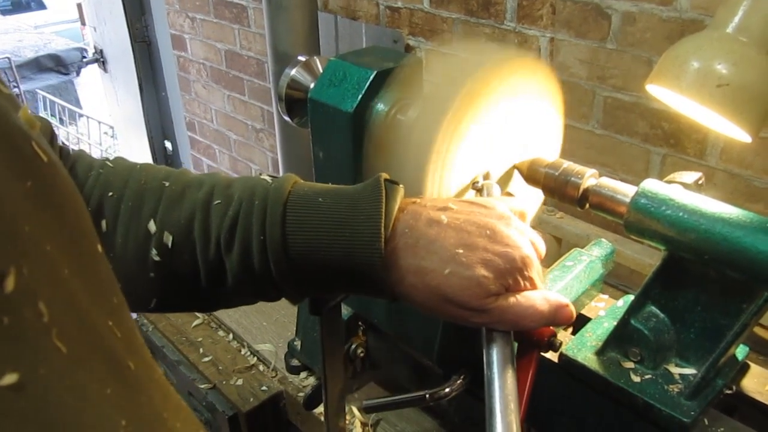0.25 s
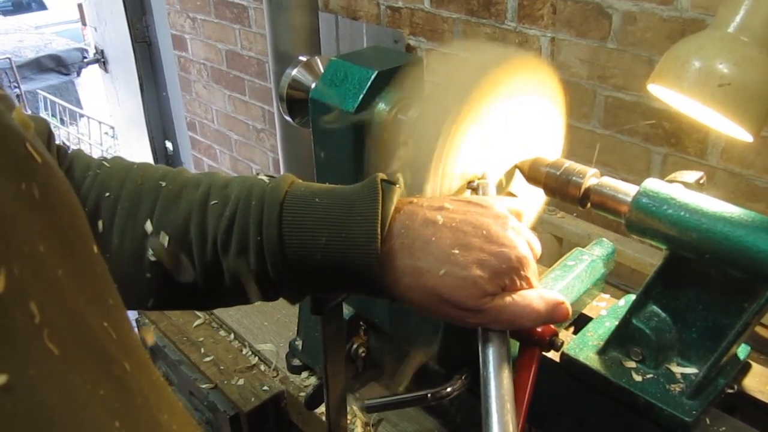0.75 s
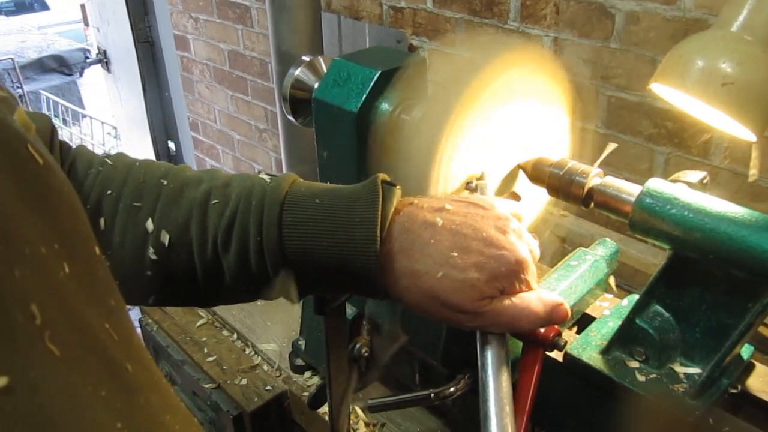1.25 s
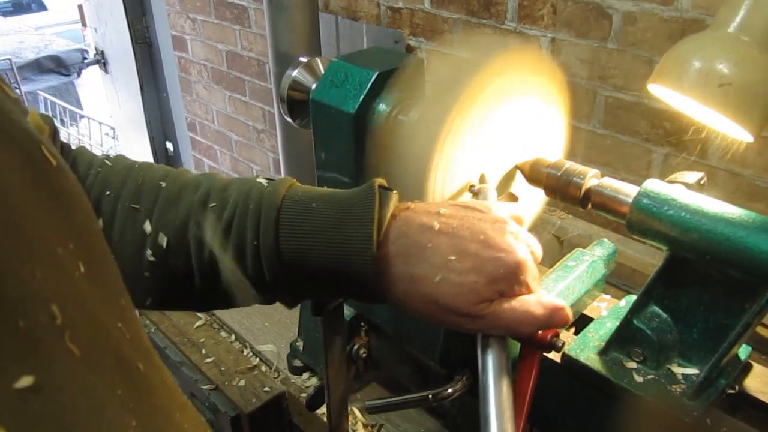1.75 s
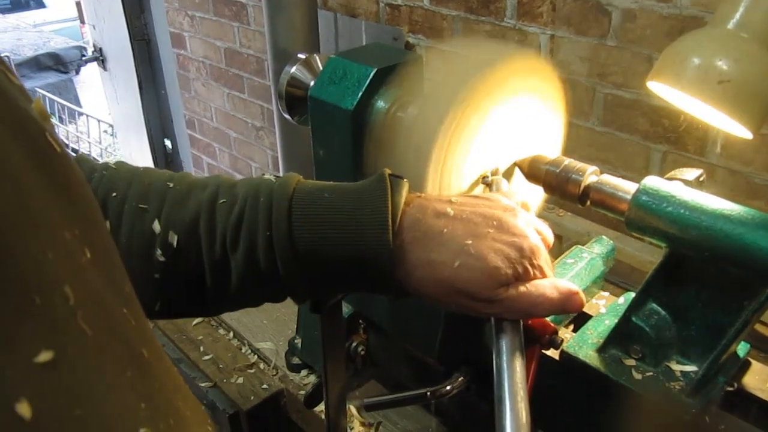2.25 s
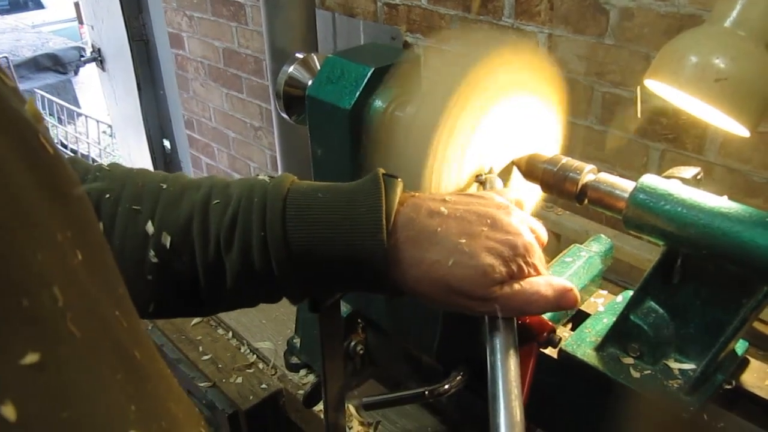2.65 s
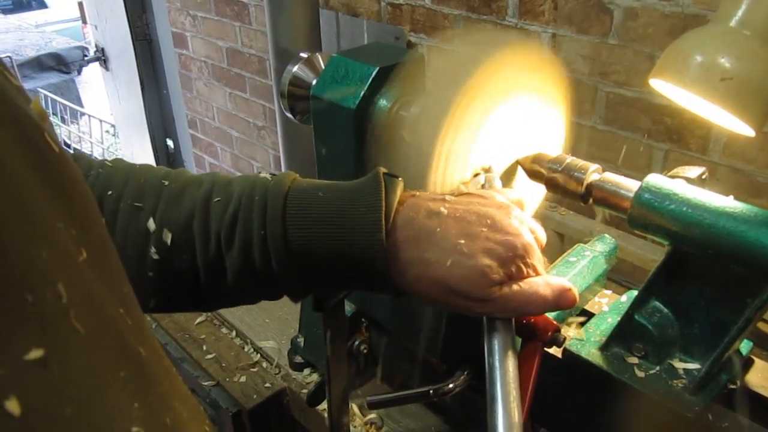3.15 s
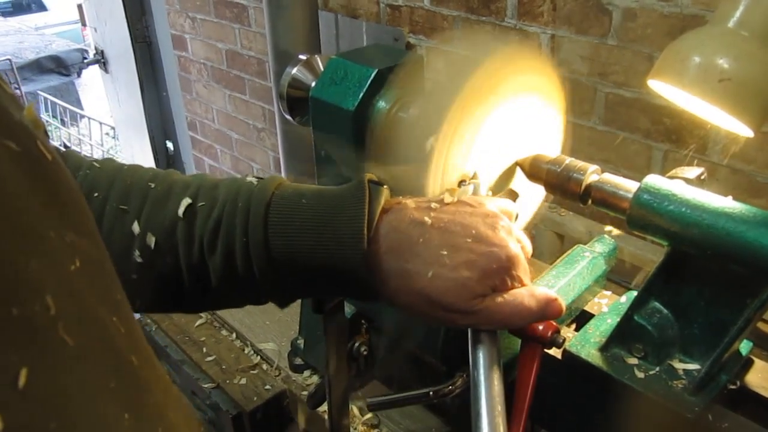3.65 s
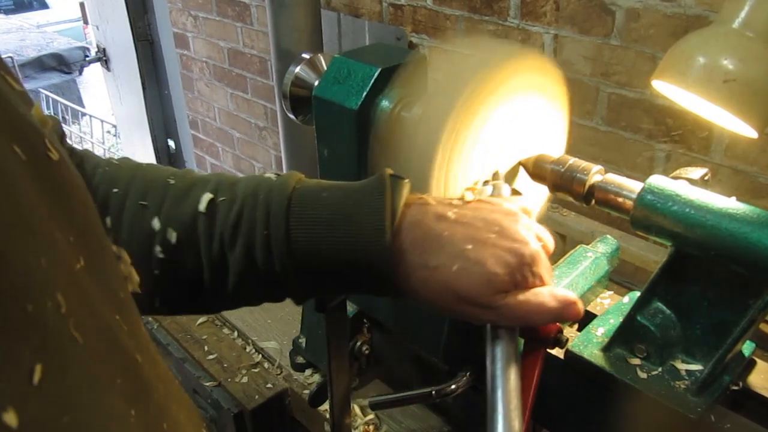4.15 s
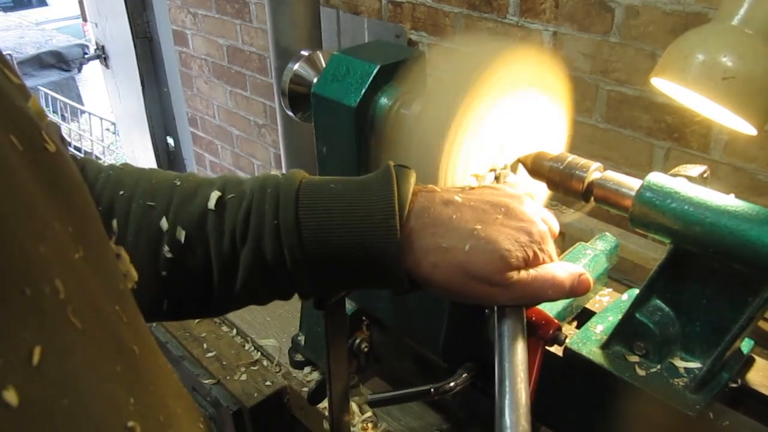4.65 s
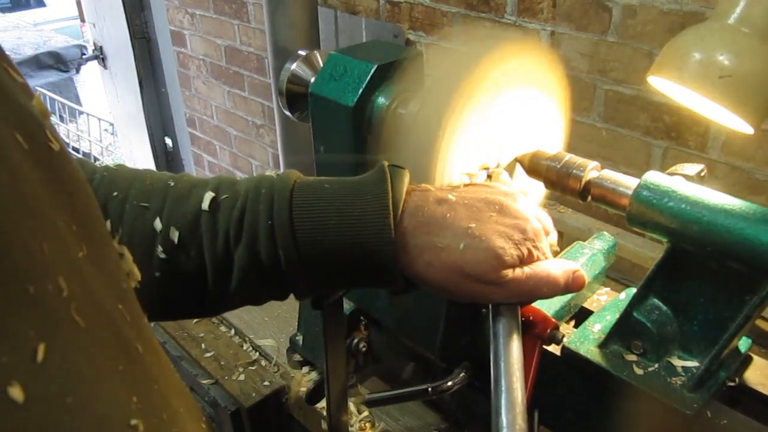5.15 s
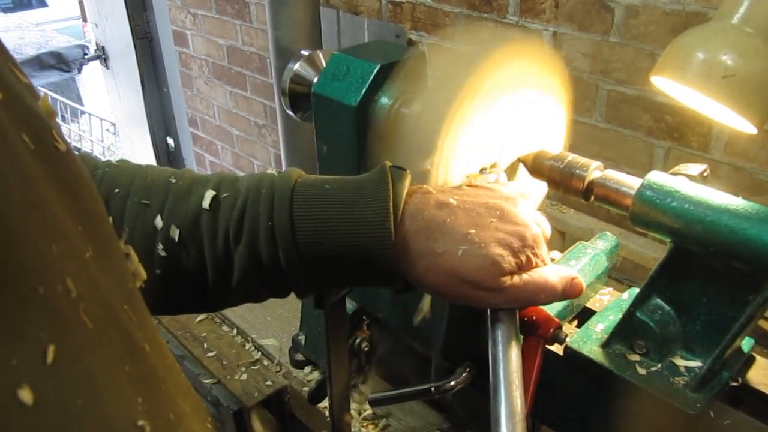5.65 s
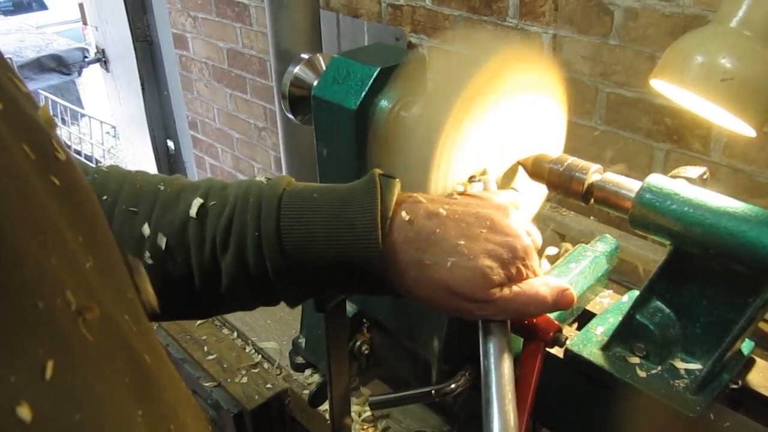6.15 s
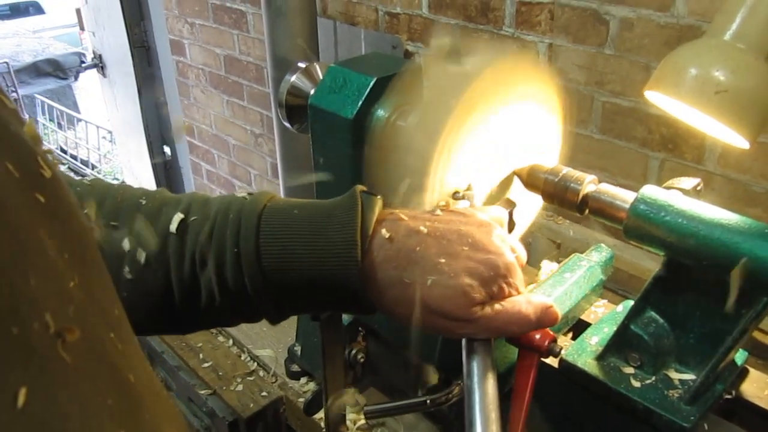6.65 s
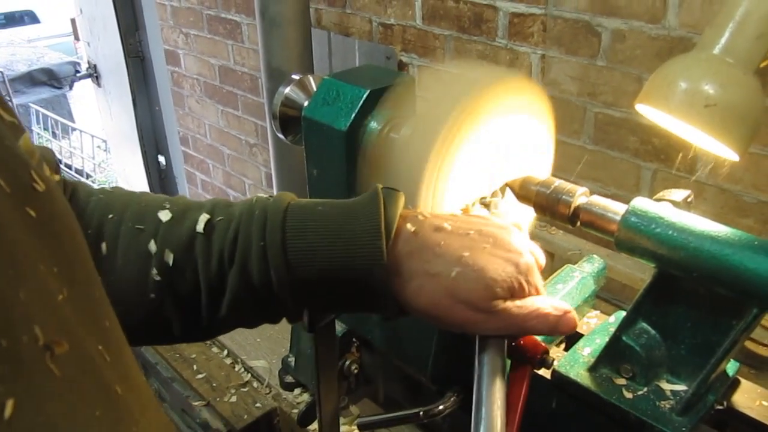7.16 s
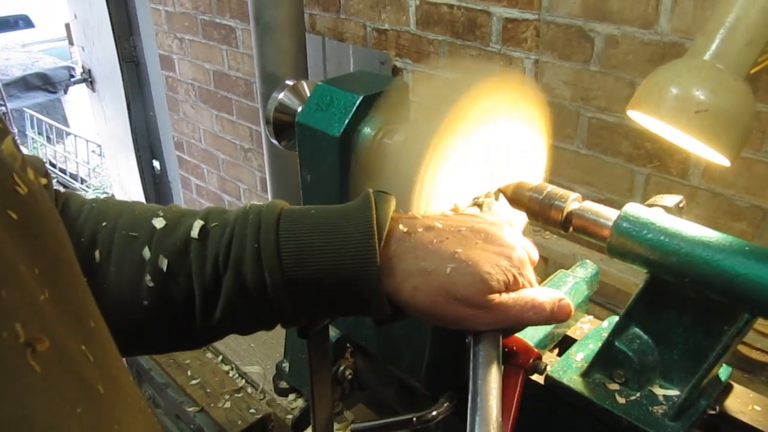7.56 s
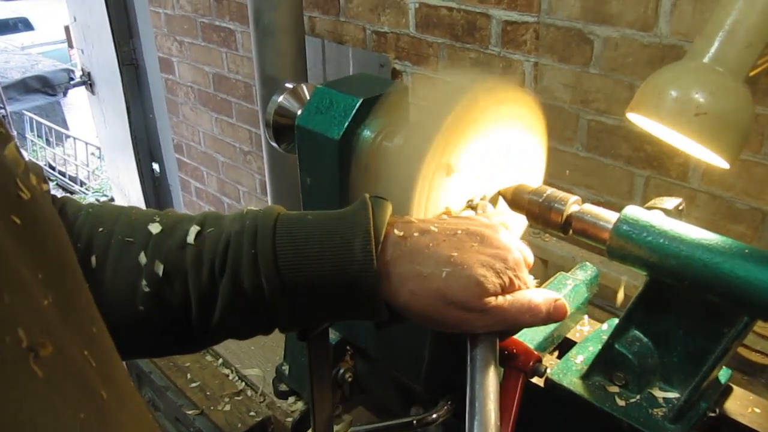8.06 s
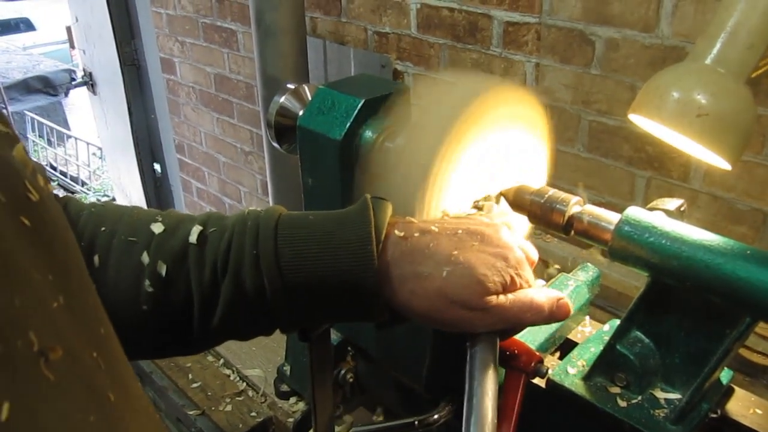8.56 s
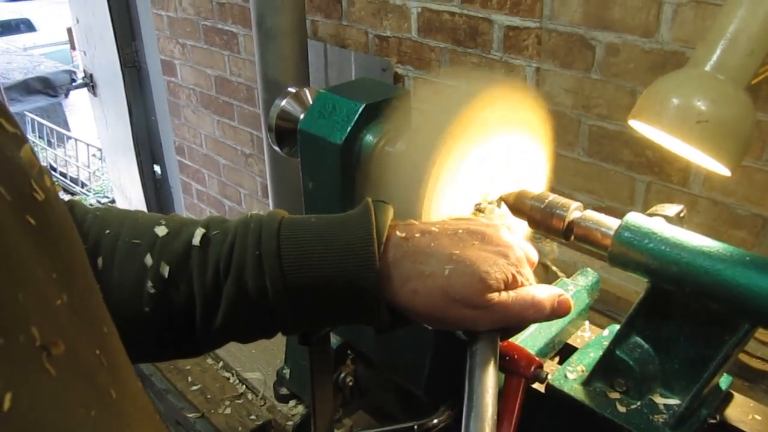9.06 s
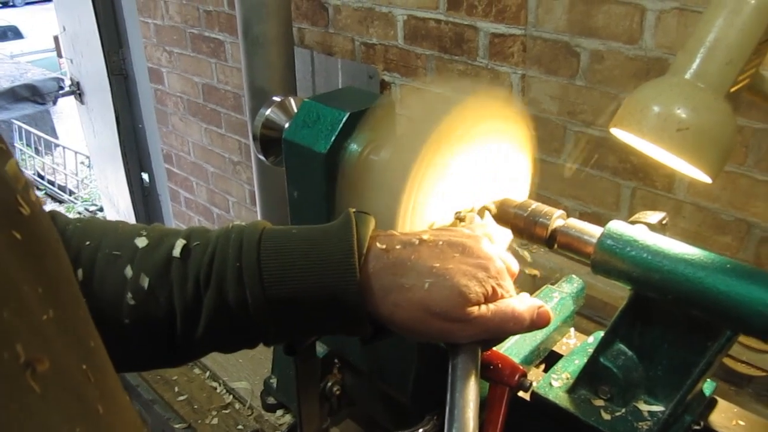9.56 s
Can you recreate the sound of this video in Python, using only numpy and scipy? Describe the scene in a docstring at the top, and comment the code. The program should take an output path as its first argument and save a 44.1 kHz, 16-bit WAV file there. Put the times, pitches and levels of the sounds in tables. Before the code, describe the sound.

A wood lathe hums and whirrs steadily in a small workshop while a gouge peels a wet bowl blank. Five cuts hiss and rasp with a rapid flutter, separated by short pauses of faint skimming. The steel rings lightly, the wood drums low, and the edge sings briefly late in each of the first three cuts. The last two are shorter and raspier as the motor grows slightly louder.

```python
"""A lathe hums and whirrs in a small brick workshop, a gouge already peeling its wet bowl blank.
Twice a turn the edge meets end grain and tears out a burst of fibres; the steel rings, the blank drums.
Soon a long shaving makes the edge sing, as it will again in the second and third cuts.
At 1.6 s the first cut ends and the tool only skims the wood, as it does in each later pause.
The last two of the five cuts are made mostly on the tip, while the drive grows louder."""
import sys
import numpy as np
from scipy import signal
from scipy.fft import rfft, irfft, next_fast_len
from scipy.io import wavfile
from scipy.ndimage import uniform_filter1d

SR = 44100
rng = np.random.default_rng(int(sys.argv[2]) if len(sys.argv) > 2 else 0)


def unload_wav(signal):
    """Save mono or channel-first audio to the path in sys.argv[1] as 16-bit WAV at rate SR, clipped to [-1, 1]."""
    wavfile.write(
        sys.argv[1],
        SR,
        np.round(np.clip(np.atleast_2d(signal).T, -1, 1) * 32767).astype(np.int16),
    )


N = 432180
TIME = np.arange(N) / SR
GRID = next_fast_len(N + SR // 2, True)
HZ = np.fft.rfftfreq(GRID, 1 / SR)
TURNS_PER_S, RELEASE_S, TOP_HZ = 16.15, 0.11, 15750

# Levels in all tables are relative.
# Steady tones of the motor: f/Hz, level/dB
MOTOR_TONES = [(32.3, -64), (100, -64.5), (199.5, -57)]
# Broad spectra of the drive's whirr and the edge's hiss, rasp and skimming: f/Hz, level/dB
WHIRR_SPECTRUM = [(15, -14), (33, -8), (55, -13), (75, -23), (125, -2.5), (175, -22), (250, -8), (370, -7),
                  (800, -3.5), (1150, -9.5), (1450, -11), (2300, -6.5), (3200, -13.5), (6000, -14),
                  (12000, -41)]
SHEAR_SPECTRUM = [(1500, -24.5), (3000, -16.5), (5000, -4), (5600, -6), (6500, -3), (7200, -1),
                  (8400, -0.5), (9200, 2), (10200, 0.5), (10900, -9.5), (11400, -8.5), (12800, -16),
                  (13700, -24), (15700, -33)]
RASP_SPECTRUM = [(150, -52), (400, -13), (700, -14), (1100, -12), (1600, -13), (1900, -3), (2400, -6),
                 (2900, 1), (3450, -0.5), (3700, 2.5), (4100, 0.5), (5000, -4.5), (6500, -10), (10000, -52)]
SKIM_SPECTRUM = [(1500, -25), (4500, -33), (5800, -1), (6700, -7.5), (7400, 6), (8200, -2), (9000, 2),
                 (10100, 1.5), (11500, -9.5), (13000, -14), (14500, -37)]
# Resonances of the cast housing and the tool rest: f/Hz, bandwidth/Hz, level/dB
HOUSING_MODES = [(200, 26, -8), (330, 16, -27), (427, 10, -6.5), (641, 61, -8), (680.5, 17, -4),
                 (850, 15, -8.5), (908.5, 15, 2), (1343, 45, -5.5), (1509, 24, -3.5), (1706, 21, -4),
                 (2283, 49, -3.5)]
REST_MODES = [(1423, 200, -16.5), (1914, 190, -11), (2836, 185, 2), (2986, 91, 5.5), (3184, 200, -1),
              (3390, 100, -2.5), (4130, 54, -22)]
# Resonances of edge, shaft and blank, cutting on the wing or the tip: f/Hz, bandwidth/Hz, level/dB
WING_EDGE_MODES = [(6470, 190, -5), (6920, 260, -5), (8990, 280, -4.5), (9440, 170, 3.5), (10820, 340, -6),
                   (11830, 220, -9.5), (13100, 300, -21)]
TIP_EDGE_MODES = [(6410, 310, 6.5), (7370, 210, -2), (9220, 240, 0), (10720, 250, 1.5), (11900, 220, -3)]
WING_SHAFT_MODES = [(4600, 140, -1), (4775, 154, 5), (4990, 190, 2)]
TIP_SHAFT_MODES = [(4714, 56, 0)]
WING_BLANK_MODES = [(198.3, 9, -0.5), (268, 20, -11.5), (320.5, 16, -4.5), (340, 11, -15),
                    (652.6, 8.4, -10.5), (892, 12, -8)]
TIP_BLANK_MODES = [(132, 35, -14), (205, 16.7, -1.5), (256.6, 16, -6), (316, 8.1, 5), (653, 19, -10),
                   (919, 27, -6.5)]
# The five cuts: start/s, end/s
CUT_TIMES = [(-0.6, 1.605), (2.05, 3.84), (4.33, 6.79), (7.42, 8.36), (8.72, 9.8)]
# Course of each cut: attack/s, then entry and exit values of hiss/dB, ring/dB, lean/dB
# (ring: shaft re hiss; lean: how much harder the first end-grain side tears than the second)
CUT_COURSES = [(1.07, -20, -26, 0, -6, -10, 4.5), (0.61, -23.8, -24.6, -4, -5.5, 7.5, -4),
               (0.54, -27.5, -22, -4.5, -7, -6, 0.5), (0.45, -24.5, -29, -2.5, -2, 4, -2),
               (0.31, -25.5, -27, 0, -4, -3.5, -2)]
# Part of the edge that cuts: t/s, share (0 broad wing, 1 narrow tip)
TIP_SHARE = [(0.3, 0.3), (1.0, 0.04), (1.6, 0.06), (2.3, 0.55), (3, 0.5), (3.4, 0.18), (3.9, 0.2),
             (4.6, 0.55), (5.2, 0.88), (5.7, 0.45), (6.1, 0.2), (6.8, 0.08), (7.5, 0.8), (9.8, 0.95)]
# Lag of the end grain behind an evenly turning spindle: t/s, lag/turns
GRAIN_LAG = [(0, 0.25), (0.45, 0.19), (1.2, 0.27), (1.6, 0.36), (2.4, 0.37), (3.0, 0.43), (3.5, 0.38),
             (3.8, 0.42), (4.7, 0.35), (5.3, 0.37), (6.1, 0.24), (6.5, 0.25), (6.85, 0.42), (7.8, 0.38),
             (8.35, 0.25), (8.95, 0.38), (9.5, 0.23), (9.8, 0.17)]
# Gap from the first end-grain side to the second, the grain being not quite straight: t/s, gap/turns
GRAIN_SPACING = [(0.3, 0.45), (1.6, 0.49), (2.4, 0.58), (3.3, 0.53), (4.8, 0.47), (6.8, 0.48), (7.8, 0.57),
                 (8.95, 0.45), (9.8, 0.48)]
# Drumming of the blank: t/s, level/dB
DRUM_LEVELS = [(0.0, -48), (0.02, -44), (1.09, -40.5), (1.63, -45.5), (1.72, -54.5), (2.7, -39.5),
               (3.66, -50.5), (3.71, -38), (4.04, -55), (4.5, -46.5), (4.91, -37.5), (4.99, -46),
               (5.16, -36.5), (5.24, -45.5), (6.25, -44.5), (6.3, -37.5), (6.55, -47), (6.58, -41.5),
               (6.88, -53.5), (7.91, -38), (8.49, -48), (9.06, -36), (9.36, -43.5), (9.8, -39)]
# Reverberation time of the workshop: f/Hz, T60/s
ROOM_DECAY = [(150, 0.1), (1500, 0.22), (4000, 0.086), (8000, 0.086), (14000, 0.018)]
# The shaving breaks off and the edge briefly loses its hold: t/s, half-length/s, loss/dB
EDGE_SLIPS = [(0.07, 0.029, 2.5), (0.896, 0.051, 4), (3.612, 0.03, 10), (5.248, 0.026, 7.5)]
# Hardest catches of the edge: t/s, hiss/dB, rasp/dB, ring/dB
EDGE_CATCHES = [(0.104, -6.5, -18.5, -14.5), (0.2633, -9, -35, -24), (0.3237, -9, -25, -23),
                (0.382, -8, -18, -12), (0.5077, -3, -25, -30), (0.6918, -4.5, -29, -21),
                (0.7537, -5, -28, -16), (0.816, -5, -30, -25), (0.847, -5.5, -23.5, -18),
                (0.9428, -6.5, -34, -31), (1.1293, -5, -26, -28), (1.2526, -9, -35, -29),
                (1.3798, -7, -32, -35), (1.504, -6, -22, -24), (1.5688, -7, -30, -26),
                (1.5986, -10, -22, -21), (1.8856, -16, -33, -28), (2.0652, -23, -35, -39),
                (2.1251, -20, -34.5, -32), (2.2408, -23, -35, -35), (2.3092, -18, -32, -28),
                (2.4319, -14, -26, -32), (2.4743, -13, -23, -31), (2.593, -12, -28, -25),
                (2.9023, -8, -17, -22), (3.0919, -9, -31, -28), (3.15, -11, -22, -23),
                (3.3358, -10, -32, -29), (3.6436, -3, -29, -25), (3.6716, -8, -19, -25),
                (3.8357, -8.5, -28, -36), (4.8803, -8, -17, -25), (4.9137, -13, -19, -33),
                (5.2829, -8.5, -15.5, -27), (5.3744, -9, -19.5, -35), (5.7423, -12, -19, -30),
                (6.0791, -8, -21, -18), (6.3285, -3.5, -22, -17), (6.5799, -4, -22, -35),
                (6.7075, -7.5, -25, -24), (6.8024, -8, -28, -30), (7.7948, -24, -18, -33),
                (8.0352, -15, -16, -23), (8.279, -15, -23.5, -18.5), (8.3404, -14, -22.5, -16),
                (8.6014, -21, -33, -26), (8.9024, -20, -24, -30), (9.09, -10.5, -19, -26),
                (9.638, -12, -14, -21), (9.6704, -14, -21, -15), (9.6994, -10, -17.5, -29),
                (9.761, -13, -19, -30)]
# Long shavings of the first three cuts: start/s, initial level/dB, nominal initial f/Hz, sag/(Hz/s)
LONG_SHAVINGS = [(0.38, -38, 2163, 80), (3.02, -38.5, 2170, 240.4), (5.881, -35, 2134, 100)]


def amp(db):
    """Amplitude ratio of a level in decibels."""
    return 10 ** (np.asarray(db) / 20)


def unit(x):
    """Normalisation to rms 1."""
    return x / np.sqrt(np.mean(x ** 2) + 1e-20)


def blend(a, b, share):
    """Linear interpolation from a at share 0 to b at share 1."""
    return a + (b - a) * share


def along(points, hz):
    """Interpolation of (f/Hz, value) points on a logarithmic frequency axis."""
    f, values = np.transpose(points)
    return np.interp(np.log(hz + 1), np.log(f + 1), values)


def curve(points):
    """Linear interpolation of (t/s, value) points at every sample."""
    return np.interp(TIME, *np.transpose(points))


def wobble(rate):
    """Band-limited noise: a smooth curve through `rate` random knots a second."""
    knots = rng.standard_normal(next_fast_len(int(N * rate / SR) + 4, True))
    fine = signal.resample(knots, 8 * len(knots))
    return np.interp(TIME * 8 * rate, np.arange(len(fine)), fine)


def crackle(spiky_db):
    """Amplitude-modulated noise: its strength jumps each millisecond, as with countless snapping fibres."""
    return unit(rng.standard_normal(N) * amp(spiky_db * wobble(1100)))


def filtered(x, response):
    """Linear filtering, scaled to conserve the power of white noise."""
    return irfft(rfft(x, GRID) * response / np.sqrt(np.mean(np.abs(response) ** 2)), GRID)[:N]


def colour(points):
    """Zero-phase response of a broad spectral envelope."""
    return amp(along(points, HZ))


def modes(rows):
    """Modal superposition: the causal response of damped resonators, alternating in sign."""
    return sum((-1) ** k * amp(db) * 1j * HZ * width / (centre ** 2 - HZ ** 2 + 1j * HZ * width)
               for k, (centre, width, db) in enumerate(rows))


def drive():
    """Forced vibration: the motor hums, and belt and bearings whirr in the resonant cast housing."""
    hum = 0
    for hz, db in MOTOR_TONES:
        peak = np.sqrt(2) * amp(db + 0.61 * wobble(4))
        hum += peak * np.sin(2 * np.pi * hz * TIME + 0.82 * wobble(3.5))
    whirr = filtered(crackle(spiky_db=0.5), colour(WHIRR_SPECTRUM))
    housing = filtered(crackle(spiky_db=1.5), modes(HOUSING_MODES))
    swell_db = curve([(0, 0.5), (2, -3), (4.3, 0), (7.2, 0), (8.6, 4), (9.8, 3.5)])
    return amp(swell_db) * (hum + amp(-43.5) * (whirr + housing))


def gate(start, end, attack_s):
    """Trapezoidal envelope: rise to 1, hold until the end, release."""
    return np.clip((TIME - start) / attack_s, 0, 1) * np.clip(1 - (TIME - end) / RELEASE_S, 0, 1)


def feed():
    """Depth of cut (0-1) governs level: each cut eases in from skimming and drifts from entry to exit."""
    attacks, *settings = np.transpose(CUT_COURSES)
    depth = np.max([gate(*span, attack) for span, attack in zip(CUT_TIMES, attacks)], axis=0)
    cut_db, ring_db, lean_db = [np.interp(TIME, np.ravel(CUT_TIMES), np.column_stack(entry_exit).ravel())
                                for entry_exit in zip(settings[::2], settings[1::2])]
    swing_db = 3.3 * np.cos(2 * np.pi * 4.808 * (TIME - 1.885))  # skimming swells and fades regularly
    skim_db = -41 + 0.56 * TIME + swing_db
    slip_db = sum(db * np.exp(-((TIME - s) / half) ** 2) for s, half, db in EDGE_SLIPS)
    return depth, blend(skim_db, cut_db, depth) - slip_db, ring_db, lean_db


def end_grain(lag_turns, width_s=0.0032, shoulder_s=0.013, scatter_db=0.75, jitter_s=0.0007):
    """Quasi-periodic pulses: one burst a turn, on a broad shoulder where the grain runs at a slant."""
    turns = TIME * TURNS_PER_S - lag_turns
    index = np.round(turns).astype(int)
    timing, strength = rng.standard_normal((256, 2))[index].T
    away_s = (turns - index) / TURNS_PER_S + jitter_s * timing
    pulse = np.exp(-(away_s / width_s) ** 2) + 0.59 * np.exp(-(away_s / shoulder_s) ** 2)
    return amp(scatter_db * strength) * pulse


def cutting_force(lean_db, side_grain=0.23):
    """Wood is anisotropic: it peels steadily along the grain and tears twice a turn across it."""
    lag = curve(GRAIN_LAG)
    first = amp(lean_db / 2) * end_grain(lag)
    second = amp(-lean_db / 2) * end_grain(lag + curve(GRAIN_SPACING))
    force = (side_grain + first + second) * amp(0.96 * wobble(150))
    running_rms = np.sqrt(np.abs(uniform_filter1d(force ** 2, size=SR // 8)))
    return force / running_rms  # the feed alone sets the mean force


def tearing(strength, response, spiky_db, stray_db):
    """Source and filter: fibres snap into a resonator, each shaving driving it a little differently."""
    return filtered(strength * unit(crackle(spiky_db) * amp(stray_db * wobble(45))), response)


def shear_hiss(peel, tip_share):
    """Broadband excitation: shearing fibres hiss and drive the high modes of the cutting edge."""
    broad = tearing(peel, colour(SHEAR_SPECTRUM), spiky_db=2.5, stray_db=-0.43)
    wing = tearing(peel * np.sqrt(1 - tip_share), modes(WING_EDGE_MODES), spiky_db=3.5, stray_db=3.5)
    tip = tearing(peel * np.sqrt(tip_share), modes(TIP_EDGE_MODES), spiky_db=0.5, stray_db=0.5)
    return amp(-3) * broad + amp(-4.5) * (wing + tip)


def scrape_rasp(scrape, tip_share):
    """Mechanical coupling: tearing rasps in the midrange and, through the tip, drives the tool rest."""
    broad = tearing(scrape * (1 - 0.3 * tip_share), colour(RASP_SPECTRUM), spiky_db=1.5, stray_db=2.25)
    rest = tearing(scrape * np.sqrt(tip_share), modes(REST_MODES), spiky_db=1.5, stray_db=1.5)
    return amp(-1) * broad + amp(-2.5) * rest


def shaft_ring(bend, tip_share):
    """Damping sets bandwidth: cutting on the tip damps the steel shaft less, so it rings purer."""
    wing_gain = np.sqrt(1 - tip_share ** 2)
    wing = tearing(bend * wing_gain, modes(WING_SHAFT_MODES), spiky_db=4.5, stray_db=2.0)
    tip = tearing(bend * tip_share, modes(TIP_SHAFT_MODES), spiky_db=3.0, stray_db=1.5)
    return amp(-3.5) * wing + amp(-0.5) * tip


def blank_drum(force, depth, tip_share):
    """Inertia: the heavy blank drums in its low modes and follows the bursts only weakly."""
    press = amp(curve(DRUM_LEVELS)) * blend(0.75, 1.07, np.sqrt(depth)) * np.sqrt(force)
    wing = filtered(press * np.sqrt(1 - tip_share ** 2) * crackle(spiky_db=1), modes(WING_BLANK_MODES))
    tip = filtered(press * tip_share * crackle(spiky_db=0.5), modes(TIP_BLANK_MODES))
    return amp(0.4) * wing + amp(1) * tip


def chipped(x, patchy_db):
    """Size sets resonance: each chip lends the spectrum its own passing peaks."""
    spectra = signal.stft(x, nperseg=256)[2]
    patches = rng.standard_normal(spectra.shape)
    for _ in range(2):
        patches = uniform_filter1d(uniform_filter1d(patches, size=2, axis=0), size=4, axis=1)
    return signal.istft(spectra * unit(amp(patchy_db * unit(patches))), nperseg=256)[1][:N]


def workshop(x, tail_db):
    """Reverberation: brick walls add a short tail, which changes as blank, tool and arm move."""
    wet, hop = np.zeros(N + 2 * SR), SR // 4
    x = np.pad(x, (hop, 2 * hop))
    for start in range(0, N + hop, hop):
        hz, t, noise = signal.stft(rng.standard_normal(SR // 3), SR, nperseg=256)
        decay = amp(-60 * t / along(ROOM_DECAY, hz)[:, None])
        tail = signal.istft(noise * decay, SR, nperseg=256)[1]
        piece = x[start:start + 2 * hop] * np.sqrt(np.hanning(2 * hop))
        echo = signal.fftconvolve(piece, tail / np.linalg.norm(tail))
        wet[start + SR // 250:][:len(echo)] += echo  # 4 ms after the direct sound
    return amp(tail_db) * wet[hop:hop + N]


def caught(strength, peaks_db, rise_s, fall_s, peak_delay_s=0.0021):
    """Transient loading: as the edge catches, the tearing swings to that catch's strength and back."""
    margin = SR // 20
    padded, t = np.pad(strength, margin), np.arange(-margin, margin) / SR
    grab = np.exp(-(t / np.where(t < 0, rise_s, fall_s)) ** 2)
    for (s, *_), db in zip(EDGE_CATCHES, peaks_db):
        part = padded[round((s + peak_delay_s) * SR):][:len(t)]
        part += grab * (amp(db) - part)
    return padded[margin:-margin]


def singing(force, growth_db_per_s=3):
    """Resonance: a long shaving excites one broad band, which grows and slides down during the cut."""
    level, pitch = np.zeros(N), np.zeros(N)
    for (start, db, hz, sag), (_, end) in zip(LONG_SHAVINGS, CUT_TIMES):
        age = np.clip(TIME - start, 0, end - start)
        level += gate(start, end, attack_s=0.086) * amp(db + growth_db_per_s * age)
        pitch = np.where(TIME >= start, hz - sag * age, pitch)
    band = filtered(level * force ** 1.28 * crackle(spiky_db=1.5), modes([(2080, 185, 0)]) ** 2)
    shift_cycles = np.cumsum(pitch - 2100) / SR  # centres the band 20 Hz below the nominal pitch
    return np.real(signal.hilbert(band, GRID)[:N] * np.exp(2j * np.pi * shift_cycles))


def skim_hiss(graze):
    """Friction noise: the edge hisses thinly where it only skims the wood."""
    return amp(0.5) * tearing(graze, colour(SKIM_SPECTRUM), spiky_db=1.3, stray_db=2.5)


def gouge():
    """Common excitation: one tearing force drives hiss, rasp, singing and the ring of steel and wood."""
    depth, hiss_db, cut_ring_db, lean_db = feed()
    _, catch_hiss_db, catch_rasp_db, catch_ring_db = np.transpose(EDGE_CATCHES)
    tip_share = curve(TIP_SHARE)
    bite = blend(0.08, 0.99, np.sqrt(depth))  # 0 skimming, 1 peeling a shaving
    rasp_db = blend(-15, blend(-7, 0.1, tip_share), bite)  # re hiss: skimming, wing, tip
    ring_db = blend(-18, cut_ring_db, bite) + 1.3 * wobble(8)  # the grip on the shaft keeps changing
    force = bite * cutting_force(lean_db) + (1 - bite) * amp(3.15 * wobble(35))
    tear = caught(amp(hiss_db) * force, catch_hiss_db - 9, rise_s=0.0034, fall_s=0.0022)
    scrape = caught(amp(rasp_db + hiss_db) * force, catch_rasp_db + 0.6, rise_s=0.0053, fall_s=0.0042)
    bend = caught(amp(ring_db + hiss_db) * force, catch_ring_db + 1.6, rise_s=0.0044, fall_s=0.0026)
    hiss = shear_hiss(tear * np.sqrt(bite), tip_share) + skim_hiss(tear * np.sqrt(1 - bite))
    rasp = scrape_rasp(scrape, tip_share)
    ring = shaft_ring(bend, tip_share)
    drum = blank_drum(force, depth, tip_share)
    return chipped(hiss + rasp, patchy_db=2.5) + ring + drum + amp(-1.5) * singing(force)


def scene():
    """Superposition of the cut, its reverberation and the running lathe, in one channel."""
    cut = gouge()
    return (amp(-0.5) * (cut + workshop(cut, tail_db=-8)) + drive())[None]


def record(dry):
    """Band limiting: the microphone passes nothing above TOP_HZ."""
    return irfft(rfft(dry, GRID) * (HZ < TOP_HZ), GRID)[:, :N]


dry = scene()
out = record(dry)
unload_wav(out)
```